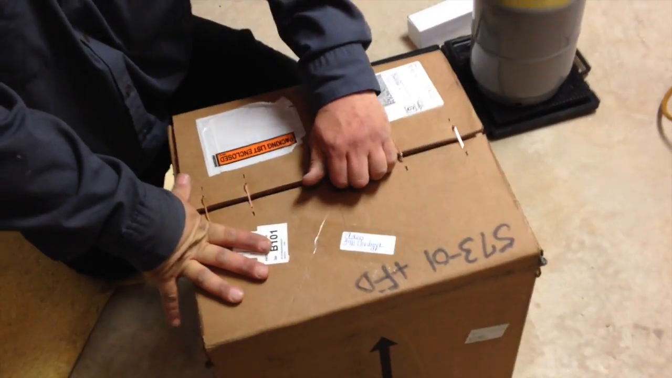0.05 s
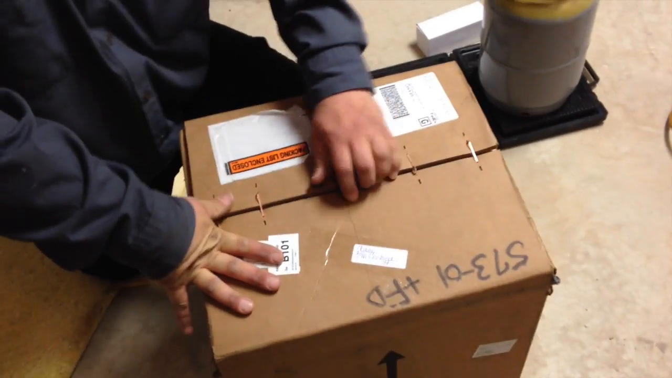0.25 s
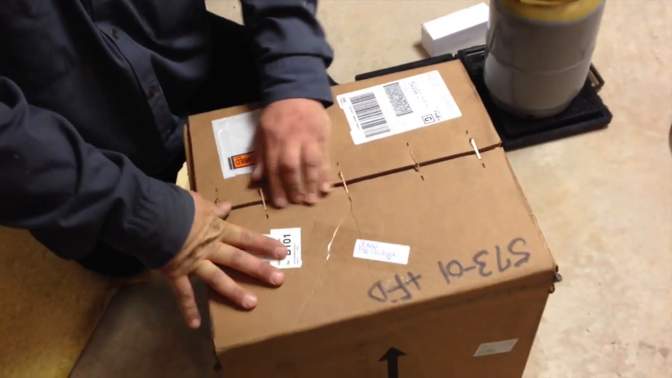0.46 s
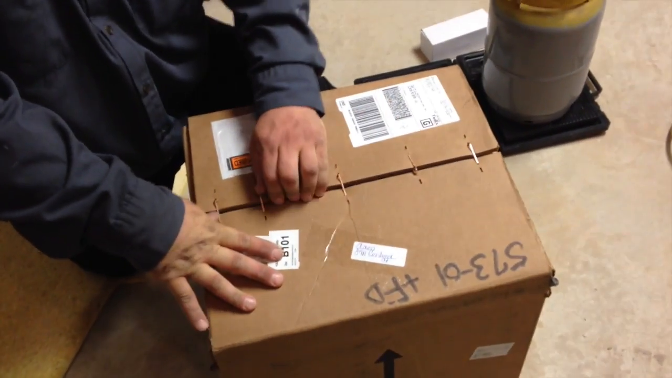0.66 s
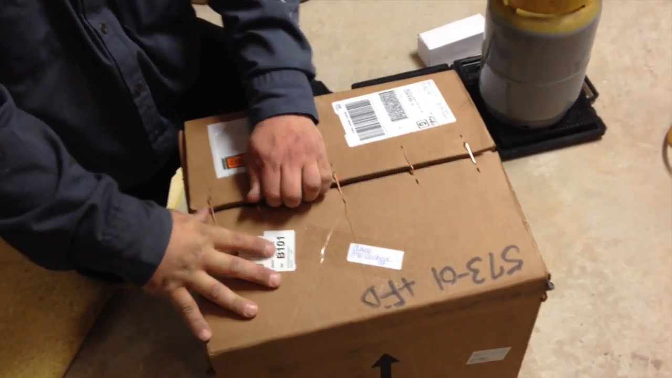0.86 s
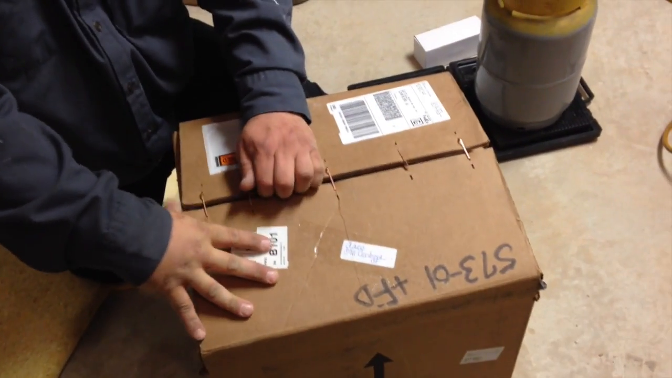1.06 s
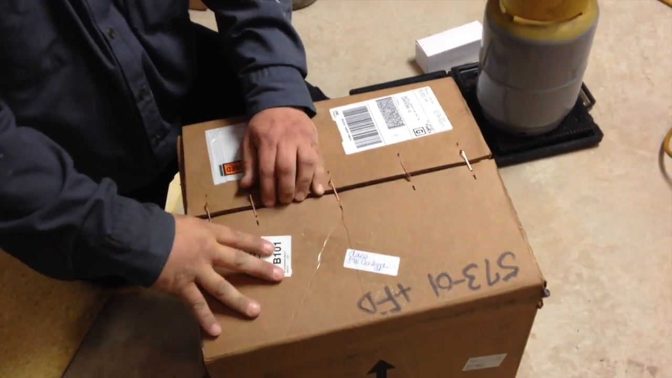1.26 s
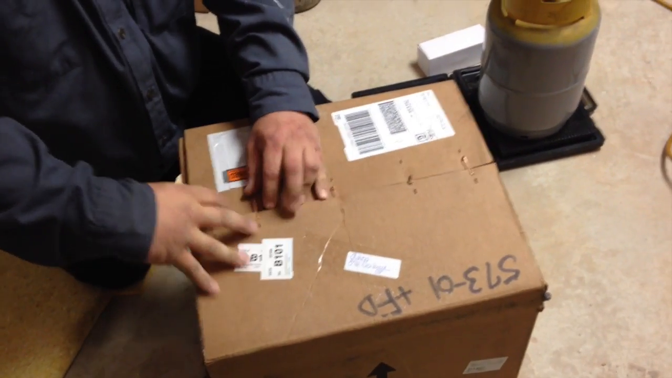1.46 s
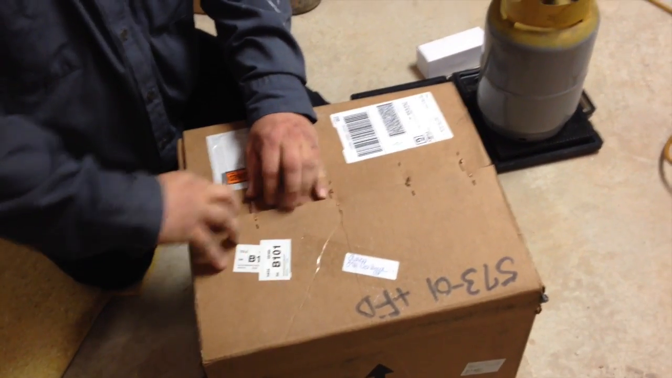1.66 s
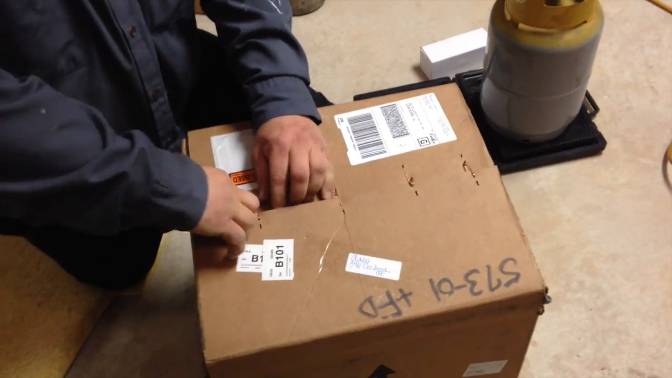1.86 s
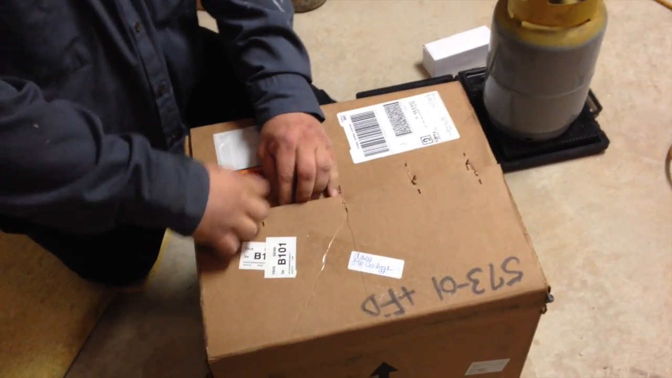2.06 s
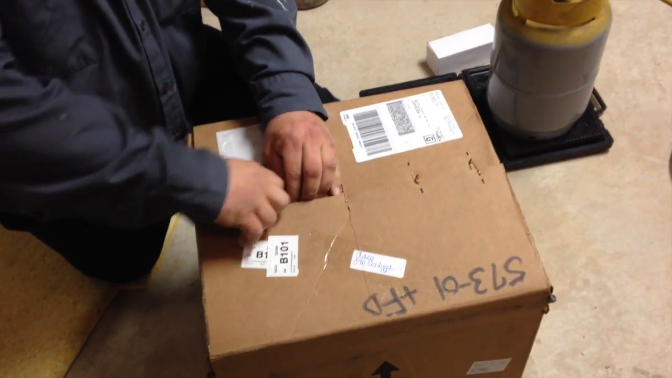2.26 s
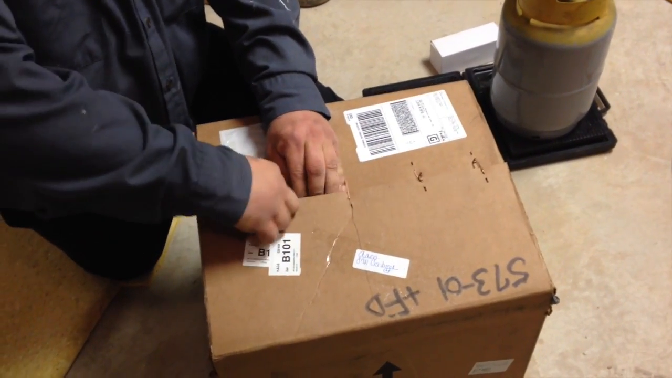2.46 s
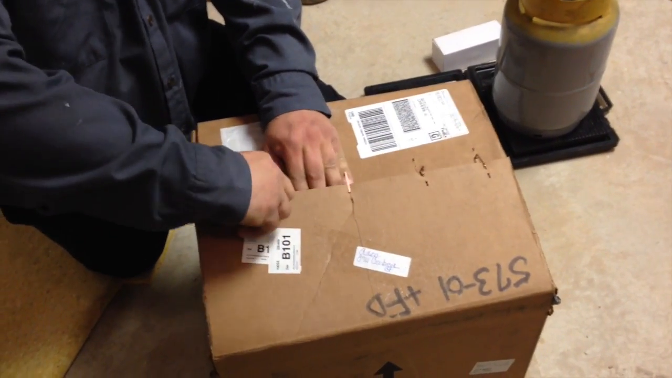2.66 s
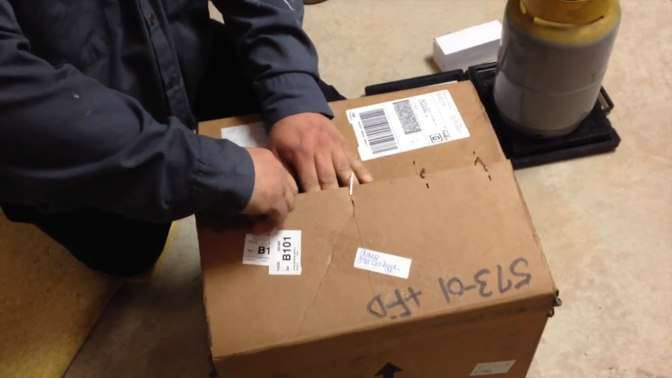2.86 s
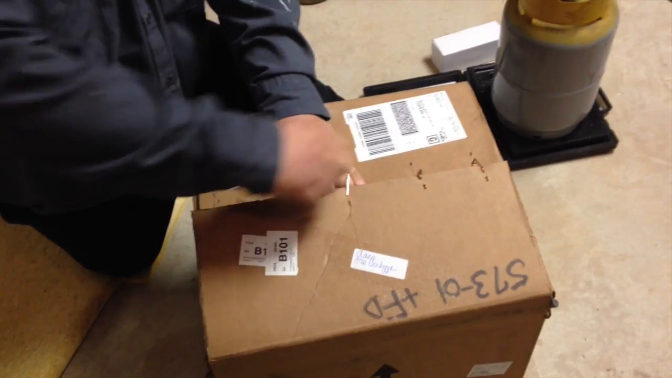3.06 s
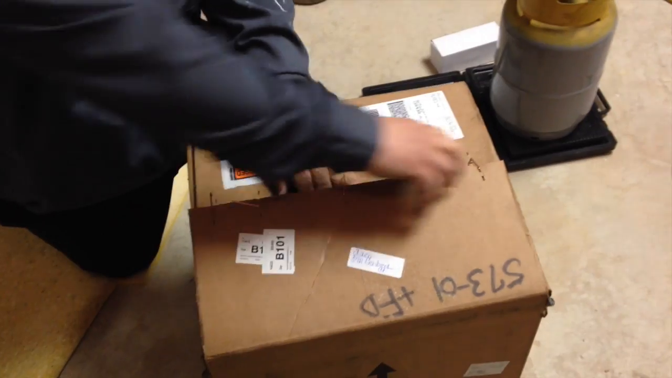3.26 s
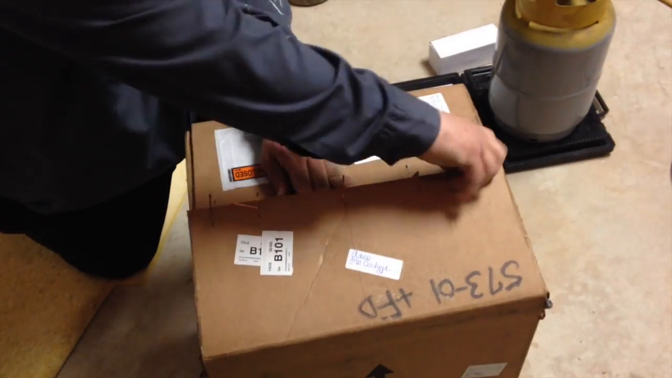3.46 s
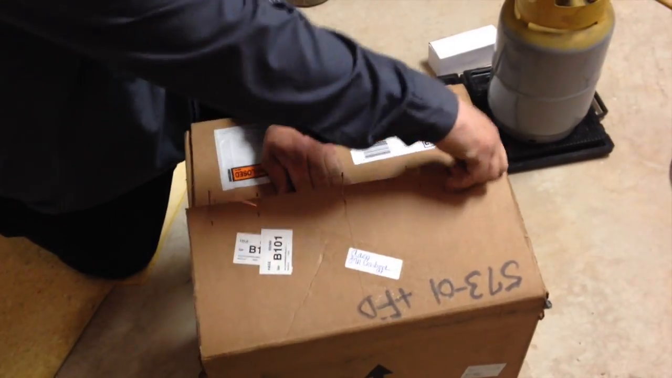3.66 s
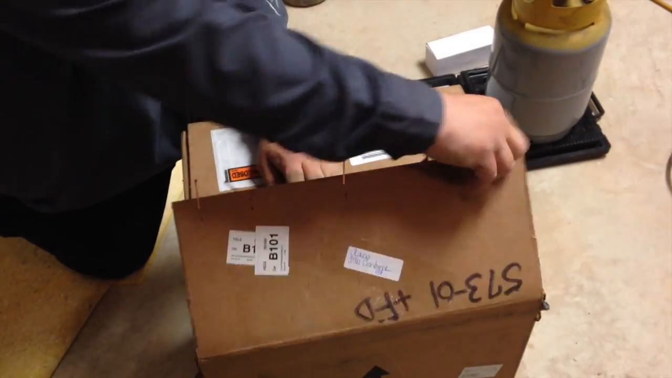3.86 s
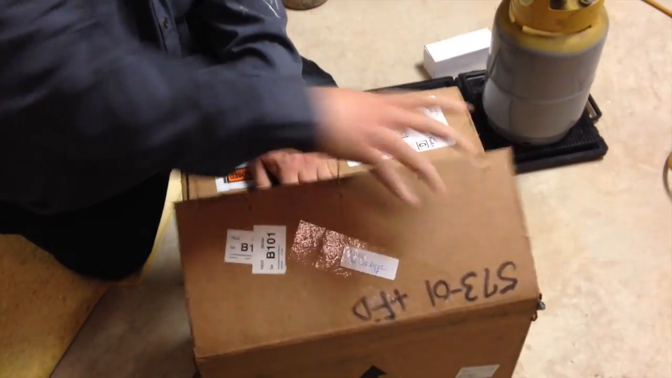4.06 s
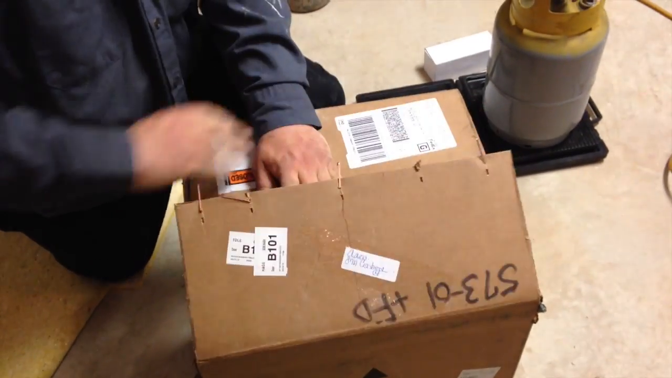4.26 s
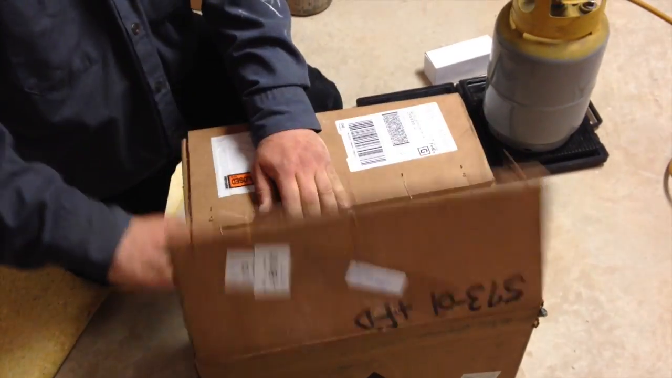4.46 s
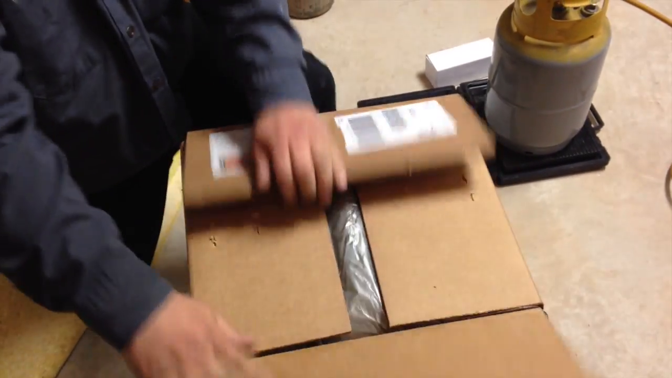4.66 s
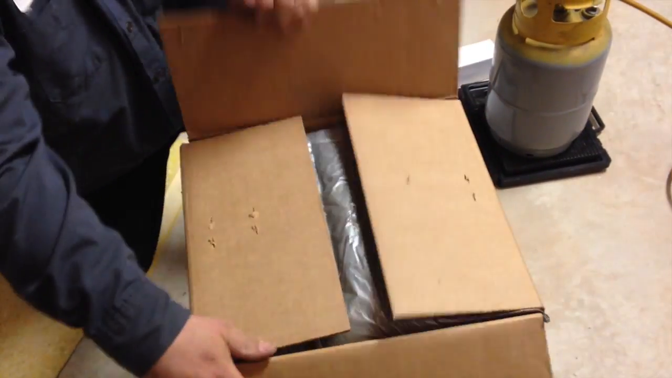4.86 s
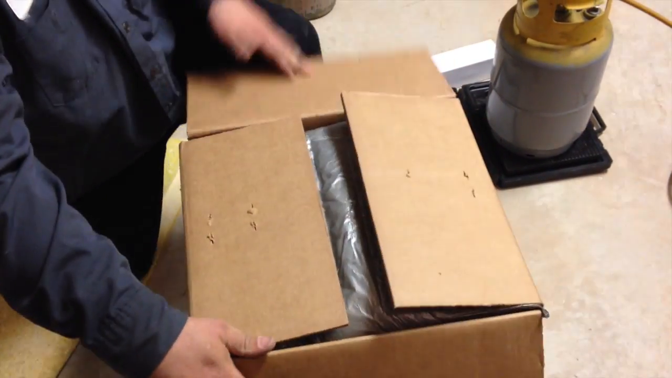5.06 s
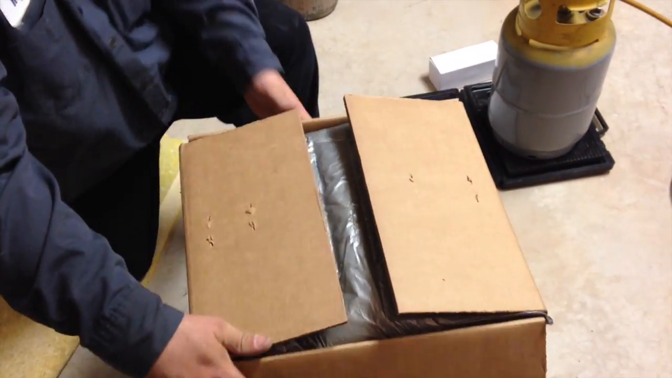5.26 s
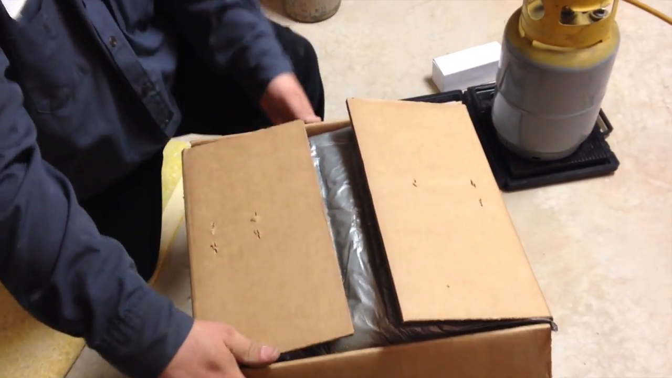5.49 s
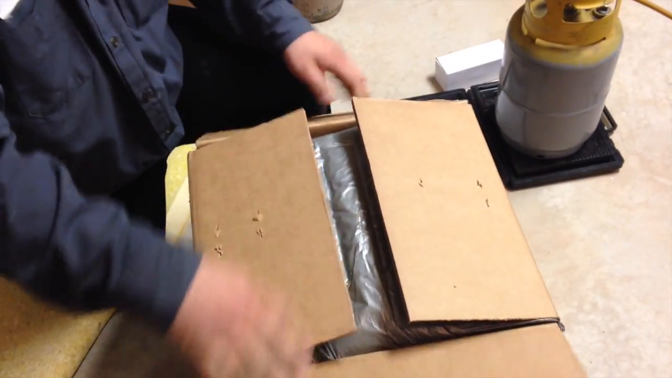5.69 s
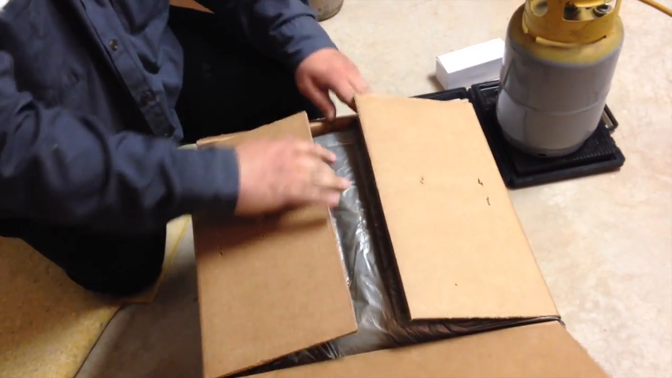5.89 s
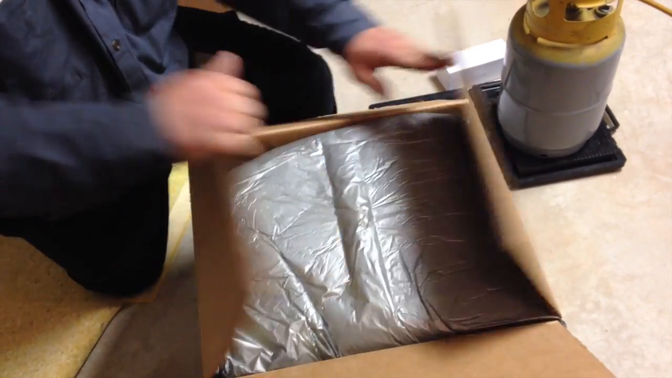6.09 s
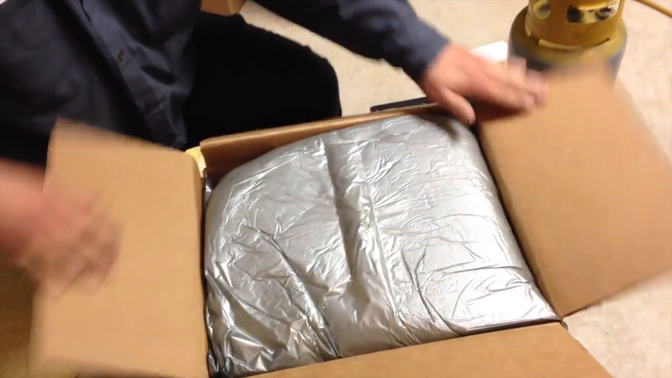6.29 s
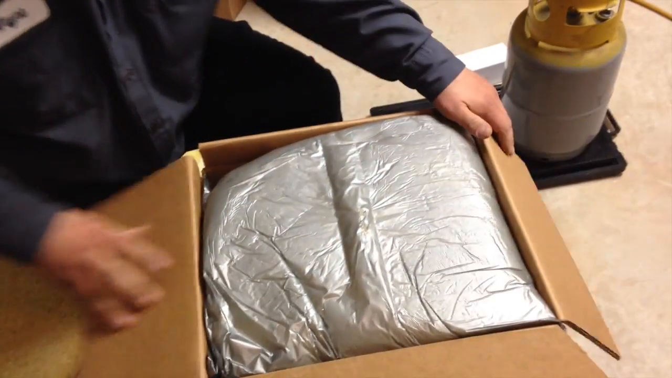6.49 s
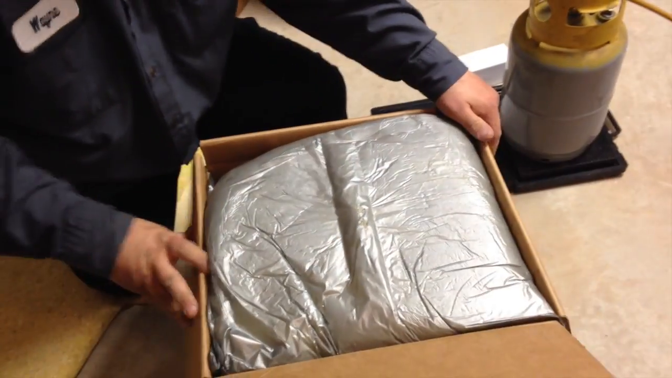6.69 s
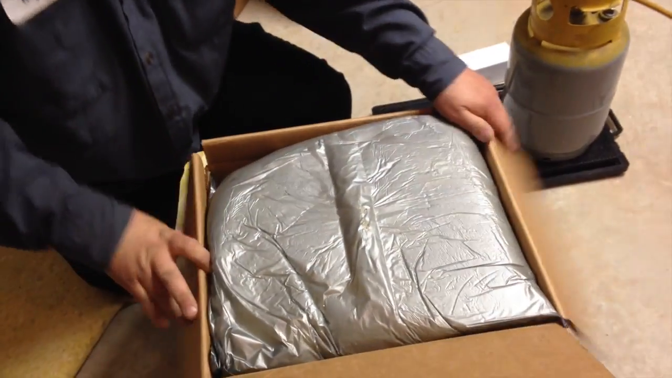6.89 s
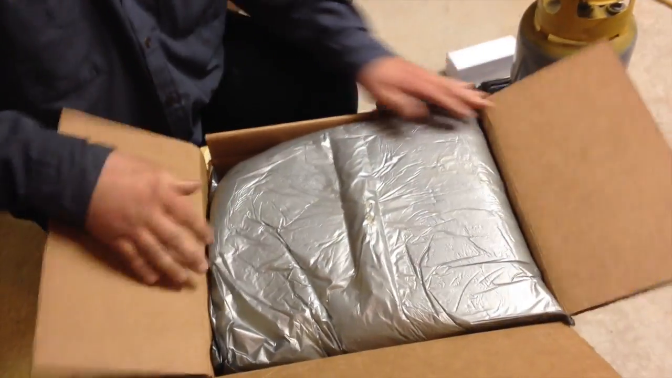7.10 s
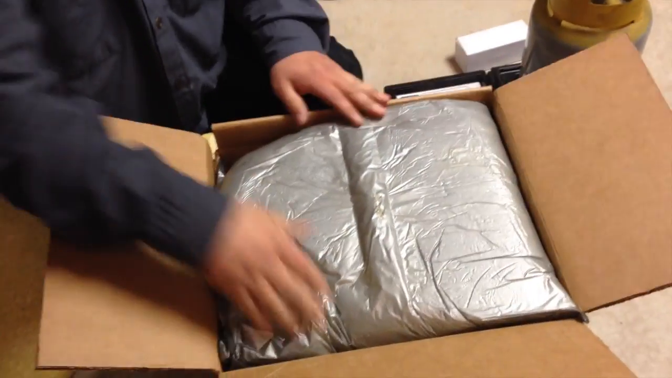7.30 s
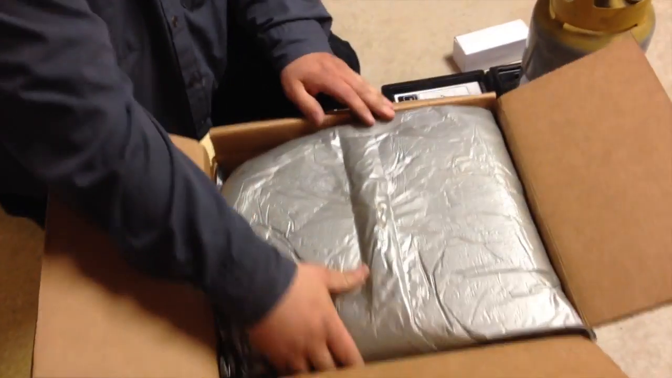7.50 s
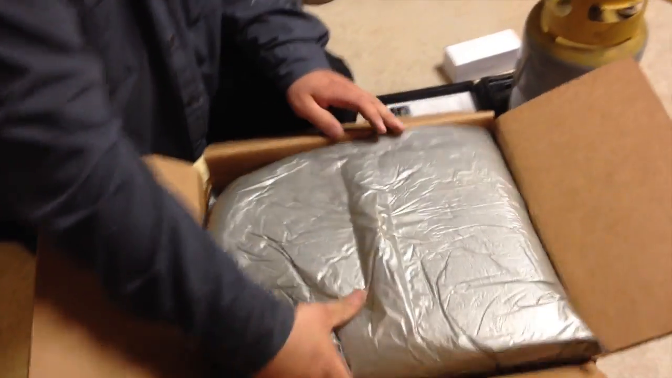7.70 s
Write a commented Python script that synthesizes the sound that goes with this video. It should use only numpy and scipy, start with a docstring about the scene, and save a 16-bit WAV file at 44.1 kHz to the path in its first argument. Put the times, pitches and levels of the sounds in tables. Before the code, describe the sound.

Hands brush and scrape over a hollow cardboard box, a stapled flap snaps loose with a loud pop, then foil wrap crinkles in a quiet room.

```python
"""A large corrugated box is opened by hand indoors, over steady room noise with a faint hum.
First hands and sleeves hiss over the board and its edges rasp; fingers pick at the stapled flaps.
Short pitched sounds, knocks on the hollow box and ripping fibres follow; a flap snaps free at 3.7 s.
The flaps fold back and graze a foil wrap from 5.75 s; at 7.4 s a hand presses into it and it crinkles.
Friction is made of random grains, the box and flaps of decaying modes, and a short room tail joins them."""
import sys
import numpy as np
from scipy import signal
from scipy.fft import rfft, irfft
from scipy.io import wavfile

SR = 44100
rng = np.random.default_rng(int(sys.argv[2]) if len(sys.argv) > 2 else 0)


def store_wav(level_fs):
    """Save 16-bit WAV to argv[1]."""
    pcm = np.round(np.clip(np.atleast_2d(level_fs), -1, 1) * 32767)
    wavfile.write(sys.argv[1], SR, pcm.T.astype(np.int16))


N = 341272
TIME = np.arange(N) / SR
BLOW_GAIN = np.sqrt(.025 * SR)   # turns energy 1 into rms 1 over a 25 ms blow
RISE_SHARE = 0.45   # a drag or press builds over this share of its length
TAP_OCTAVES = 0.62   # width of the range of box modes that a light tap wakes

# panels and air of the box, before the place of contact weights them: (pitch [Hz], level [dB], t60 [s])
BOX = [(112, 2, 0.1), (143.3, 4, 0.073), (205, 1, 0.074), (239, 1.5, 0.049), (302, 1, 0.052),
       (360, 4.5, 0.077), (422, 5, 0.036), (472, 0, 0.029), (550, 2.5, 0.075), (600, -1, 0.076),
       (684, -3.5, 0.042), (807, -1.5, 0.081)]
# strokes of a hand or sleeve over the board:
# (time of fastest moment [s], length [s], level [dB], share of length spent speeding up,
#  sheen relative to level [dB], sheen pitch [Hz]), before the layer trims
STROKES = [(0.01, 0.17, -63.5, 0.46, -22, 4940), (0.28, 0.083, -61, 0.11, 2, 9500),
           (0.408, 0.039, -61.5, .25, 6.5, 6500), (0.43, 0.13, -50, 0.2, -0.5, 10300),
           (0.535, 0.098, -57.5, 0.67, -3.5, 6500), (.68, 0.27, -64, 0.32, -3.5, 7500),
           (1.05, 0.15, -63.5, 0.64, 0, 7850), (1.242, 0.39, -61.5, 0.28, -16, 5000),
           (1.463, 0.19, -56, 0.47, 0.5, 8400), (1.775, 0.19, -56, 0.44, -1.5, 5430),
           (2.021, 0.049, -61.5, 0.45, 2, 5970), (2.513, 0.15, -65, 0.75, 0.5, 7740),
           (2.649, 0.055, -51.5, 0.52, 0.5, 7300), (3.353, 0.099, -68, 0.13, 4, 7400),
           (3.571, 0.053, -58, 0.51, -9, 6000), (3.945, 0.35, -59.5, 0.33, -3, 7200),
           (4.437, 0.064, -45, 0.25, -10, 5100), (4.611, 0.1, -53, 0.59, -11, 6000),
           (4.726, 0.29, -60, 0.73, 3, 8200), (4.884, 0.12, -50, 0.76, -3, 10300),
           (5.078, 0.076, -52, 0.34, 6, 9000), (5.436, 0.2, -58, 0.7, -3.5, 7500),
           (5.725, 0.37, -55, 0.86, 1.5, 7600), (5.861, 0.074, -62.5, 0.67, 7, 8250),
           (6.145, 0.35, -57, 0.93, -4, 7550), (6.322, 0.09, -48, 0.61, 5.5, 9750),
           (6.392, 0.17, -55, 0.42, 0, 10000), (6.504, 0.22, -48.5, 0.2, 0, 11000),
           (6.738, 0.17, -48.5, 0.52, -5, 10700), (7.062, 0.26, -50.5, 0.59, -3.5, 9750)]
# presses on the foil wrap, before the layer trims: (time of hardest moment [s], length [s], level [dB])
PRESSES = [(7.397, 0.053, -39), (7.434, 0.14, -38), (7.538, 0.23, -42), (7.654, 0.23, -38.5),
           (7.729, 0.065, -38)]
# faint shifting of hands that never quite rest, before the layer trims: (time [s], level [dB])
FIDGET = [(0, -71.5), (1.9, -66), (3.25, -74), (4.35, -70), (5.2, -63.5), (7.74, -66)]


def from_db(db):
    """Decibels to gain."""
    return 10 ** (np.asarray(db) / 20)


def rms_one(x):
    """Scale to an rms of 1."""
    return x / np.sqrt(np.mean(x ** 2) + 1e-20)


def energy_one(x):
    """Scale to an energy of 1."""
    return x / np.sqrt(np.sum(x ** 2) + 1e-20)


def in_time(rows):
    """Each column of a curve, sample by sample."""
    s, *columns = np.transpose(rows)
    return [np.interp(TIME, s, c) for c in columns]


def at_hz(points, hz):
    """Read a table on a log-frequency axis."""
    f, value = np.transpose(points)
    return np.interp(np.log(np.maximum(hz, 1)), np.log(f), value)


def dying(t, t60):
    """Exponential decay, 60 dB down after t60 seconds."""
    return np.exp(-np.log(1000) * t / t60)


def through(x, response):
    """Pass a sound through an impulse response."""
    return signal.oaconvolve(x, response)[:len(x)]


def response_of(spectrum, size=4096):
    """Causal (minimum-phase) impulse response of a spectrum, energy 1."""
    level_db = at_hz(spectrum, np.fft.rfftfreq(size, 1 / SR))
    cepstrum = irfft(np.log(from_db(level_db)))
    # folding the cepstrum onto positive time makes the phase minimal
    cepstrum[1:size // 2] *= 2
    cepstrum[size // 2 + 1:] = 0
    return energy_one(irfft(np.exp(rfft(cepstrum))))


def resonance(t, hz, q):
    """Response of one damped resonance, energy 1."""
    return energy_one(np.cos(2 * np.pi * hz * t) * t * np.exp(-np.pi * hz / q * t))


def drift(per_s):
    """Random wander with per_s knots a second and an rms of 1."""
    knots = rng.standard_normal(4000)
    return rms_one(np.interp(TIME * per_s, np.arange(len(knots)), knots))


def grains(per_s, spread_db, size=N):
    """Random tiny slips of uneven size, rms 1."""
    heights_db = spread_db * np.minimum(rng.exponential(1, size), 5)
    sizes = from_db(heights_db) * rng.choice([-1, 1], size)
    return rms_one(sizes * (rng.random(size) < per_s / SR))


def add(out, s, sound):
    """Mix a sound in at time s."""
    at = round(s * SR)
    out[at:at + len(sound)] += sound[:N - at]


def together(*gains):
    """Unrelated causes add in power."""
    return np.sqrt(sum(gain ** 2 for gain in gains))


def swell(phase, rise, ends_db=15, roundness=1.49):
    """Gain of one movement: it builds to its top at phase 0, then eases off to ends_db below."""
    rise = np.clip(rise, .05, .95)
    distance = np.maximum(-phase / rise, phase / (1 - rise))
    return from_db(-ends_db * distance ** roundness)


def movements(times, lengths, levels_db, rise=RISE_SHARE):
    """Gain of overlapping hand movements, added in power."""
    t = TIME[::64, None]   # a coarse grid is enough for a smooth gain
    gains = from_db(levels_db) * swell((t - times) / lengths, rise)
    return np.interp(TIME, t[:, 0], np.sqrt(np.sum(gains ** 2, axis=1)))


def background(air_db=-63.5, hum_hz=61, hum_db=-73.5):
    """Steady room noise is shaped noise; the faint mains hum is one sine."""
    # spectrum of the room noise: (frequency [Hz], density [dB per Hz])
    room_tone = [(25, -29), (55, -20), (90, 9.5), (170, 7), (370, 6), (600, -1), (1000, -6.5), (1900, -6.5),
                 (2900, -19.5), (5000, -15.5), (8000, -16.5), (15000, -18.5)]
    air = from_db(air_db) * through(rng.standard_normal(N), response_of(room_tone))
    hum = from_db(hum_db) * np.sqrt(2) * np.sin(2 * np.pi * hum_hz * TIME)
    return air + hum


def sliding(flutter_db=1.55, hiss_db=1.0, sheen_db=-1.0, fidget_sheen_db=-8, catch_db=-11.5,
            patchy_db=3.5, sheen_octaves=0.54):
    """Skin and cloth on paper: very fine friction and a few catches; each stroke's sheen has its pitch."""
    # spectrum of the friction: (frequency [Hz], density [dB per Hz])
    hiss_spectrum = [(1100, -3.5), (2300, 2), (2900, -3), (4000, 3.5), (5200, 4), (6300, 1), (7500, -5.5),
                     (9500, -7), (15000, -17)]
    s, length, level, rise, brightness, pitch_hz = np.transpose(STROKES)
    fidget = from_db(in_time(FIDGET)[0])
    fine = from_db(hiss_db) * grains(per_s=8000, spread_db=0.5)
    catches = from_db(catch_db) * grains(per_s=130, spread_db=0.5)
    hiss = together(movements(s, length, level, rise), fidget) * through(fine + catches, response_of(hiss_spectrum))

    # share each stroke's sheen among bands by their distance from its pitch
    bands = np.geomspace(4800, 13500, 7)
    shares = 1 / (1 + (np.log2(bands[:, None] / pitch_hz) / sheen_octaves) ** 2) ** 2
    shares_db = 10 * np.log10(shares / shares.sum(axis=0))
    fidget_sheen = from_db(fidget_sheen_db) * fidget / np.sqrt(len(bands))
    sheen = 0
    for hz, share_db in zip(bands, shares_db):
        skim = together(movements(s, length, level + brightness + share_db, rise), fidget_sheen)
        patches = from_db(patchy_db * drift(45))   # the contact is never even
        ring = resonance(TIME[:SR // 100], hz, q=3.6)
        sheen = sheen + skim * patches * through(grains(per_s=4200, spread_db=3.5), ring)
    return from_db(flutter_db * drift(110)) * (hiss + from_db(sheen_db) * sheen)


def box_ring(t, pitch_hz, chance=0, stretch=1, octaves=TAP_OCTAVES, uneven_db=4.5, radiate_hz=108):
    """The modes of the hollow box; the place of contact favours those near one pitch."""
    hz, db, t60 = np.transpose(BOX)
    gain = from_db(db + uneven_db * chance) / (1 + (np.log2(hz / pitch_hz) / octaves) ** 2)
    gain = gain * (-1) ** (np.arange(len(hz)) // 2)   # panels swing in and out against each other
    modes = np.sin(2 * np.pi * stretch * hz[:, None] * t) * dying(t, t60[:, None])
    # a small box radiates little bass
    high_pass = signal.butter(2, radiate_hz, "high", fs=SR, output="sos")
    return energy_one(signal.sosfilt(high_pass, gain @ modes))


def scraping(judder_db=4.2, drum_hz=265, rasp_db=-2.5, drum_db=-2.5, fidget_rasp_db=-2.0, fidget_drum_db=-1.0,
             stroke_rasp_db=-11.5, stroke_drum_db=-20, press_rasp_db=-15, press_drum_db=-18):
    """Edges and hands catch on the corrugation: coarse slips rasp in the board and drum on the box."""
    # board edges dragging on board, before the layer trims: (time of hardest moment [s], length [s],
    #  rasp level [dB], box drumming level [dB], drumming pitch [Hz])
    drags = [(0.322, 0.3, -68, -57.5, 272), (0.658, 0.089, -55.5, -56.5, 231),
             (0.788, 0.074, -43.5, -44.5, 297), (0.836, 0.075, -47.5, -44.5, 236),
             (1.29, 0.43, -59, -58, 318), (1.765, 0.054, -45, -46.5, 265), (2.008, 0.029, -49, -50.5, 383),
             (2.633, 0.068, -61, -54.5, 398), (3.394, 0.037, -61, -51, 190),
             (3.549, 0.1, -52.5, -50.5, 247), (3.954, 0.11, -65, -53.5, 350),
             (4.34, 0.038, -55, -47.5, 288), (4.413, 0.06, -57, -50, 400), (4.462, 0.035, -65, -44, 139),
             (4.59, 0.28, -61, -58.5, 355), (4.755, 0.053, -57, -50, 560), (4.822, 0.053, -53.5, -50, 370),
             (5.093, 0.043, -58, -47, 210), (6.793, 0.18, -54.5, -61.5, 372)]
    # spectrum of the rasp: (frequency [Hz], density [dB per Hz])
    rasp_spectrum = [(300, -5.5), (600, -1.5), (850, 0), (1150, 2), (1750, 4.5), (2150, 2), (2450, -1.5),
                     (2900, -15), (4500, -9.5), (9000, -27)]
    t, board = TIME[:SR // 4], response_of(rasp_spectrum)

    # hands: strokes, presses and fidgeting share one run of slips
    slips = grains(per_s=1600, spread_db=2.4) * from_db(judder_db * drift(90))
    hand = movements(*np.transpose(STROKES)[:4])
    press = movements(*np.transpose(PRESSES))
    fidget, = in_time(FIDGET)
    rasp_gain = together(from_db(stroke_rasp_db) * hand, from_db(press_rasp_db) * press,
                         from_db(fidget + fidget_rasp_db))
    drum_gain = together(from_db(stroke_drum_db) * hand, from_db(press_drum_db) * press,
                         from_db(fidget + fidget_drum_db))
    rasp = rasp_gain * through(slips, board)
    drum = drum_gain * through(slips, box_ring(t, drum_hz))

    # edges: each drag drums at a pitch set by where it drags
    edge_slips = grains(per_s=1600, spread_db=2.4) * from_db(judder_db * drift(90))
    for s, length, rasping, drumming, pitch_hz in drags:
        near = np.abs(TIME - s) < 2 * length
        push = edge_slips[near] * swell((TIME[near] - s) / length, RISE_SHARE)
        rasp[near] += from_db(rasping) * through(push, board)
        drum[near] += from_db(drumming) * through(push, box_ring(t, pitch_hz))
    return from_db(rasp_db) * rasp + from_db(drum_db) * drum


def chirps(onset=0.12, q=3.8):
    """A dying burst of noise, as of stick-slip or a snap, drives one resonance; longer ones start softer."""
    # pitched slips of fingers, staples and board edges, and short rings of the flap
    # as it snaps free and rebounds: (time [s], level [dB], pitch [Hz], t60 of the burst [s])
    pitched_sounds = [(.428, -47, 1750, 0.26), (1.4315, -41.5, 1860, 0.0081), (1.761, -47.5, 1640, 0.054),
                      (2.3718, -44.5, 5760, 0.017), (2.395, -48.5, 5560, .04), (3.064, -55.5, 1270, 0.022),
                      (3.0636, -49.5, 4160, 0.017), (3.155, -54, 2000, 0.0092), (3.156, -51, 1140, 0.027),
                      (3.686, -41.5, 830, 0.021), (3.72, -45.5, 378, 0.046), (3.769, -52, 384, 0.02),
                      (3.929, -51.5, 5850, 0.053), (4.411, -52, 1070, 0.053), (5.9376, -52, 2060, 0.0057)]
    out, t = np.zeros(N), TIME[:SR // 4]
    for s, db, hz, t60 in pitched_sounds:
        burst = rng.standard_normal(len(t)) * dying(t, t60) * (1 - np.exp(-t / (onset * t60)))
        chirp = energy_one(through(burst, resonance(t, hz, q)))
        add(out, s, from_db(db) * chirp * BLOW_GAIN)
    return out


def flap_ring(t, detune=0.063):
    """The flap's bending modes, shifted at random by where it is held and touched."""
    # bending modes before the shift: (pitch [Hz], level [dB], t60 [s])
    flap_modes = [(862, -5, 0.032), (1080, -4, 0.03), (1187, 1.5, 0.011), (1410, 2, 0.011),
                  (1697, -4, 0.019), (1850, -3, 0.026), (2085, 2.5, 0.008), (2120, -16.5, 0.012)]
    hz, db, t60 = np.transpose(flap_modes)
    gain = from_db(db) * (-1) ** np.arange(len(hz))
    hz = hz * (1 + detune * rng.standard_normal(len(hz)))
    return gain @ (np.sin(2 * np.pi * hz[:, None] * t) * dying(t, t60[:, None]))


def knocks(clack_t60=0.035, crack_t60=0.062, first_slip=0.63, crack_db=-7.5, grip=0.032, taut=0.013,
           relax_s=0.016, rattle_db=-12.5, rattle_t60=0.078, octaves_per_db=0.1):
    """Blows thump the box; giving fibres make the flap clack and crack, and the loose flap rattles on."""
    # blows, levels as rms over 25 ms, crack before its trim: (time [s], thump level [dB],
    #  thump pitch [Hz], board clack level [dB], fibre crack level [dB])
    blows = [(0.792, -48.5, 302, -50, -56), (0.862, -49.5, 215, -68, -63), (1.315, -53, 367, -56, -73),
             (1.385, -53.5, 350, -53.5, -52), (1.436, -41, 185, -52.5, -34), (1.82, -45, 330, -47, -40.5),
             (2.124, -46, 310, -56.5, -56), (2.25, -46, 182, -50.5, -63), (2.376, -42, 200, -53, -43),
             (2.451, -47, 200, -72, -76), (2.885, -53.5, 168, -88, -78), (2.942, -55, 281, -74, -67),
             (3.091, -52.5, 500, -62, -60), (3.411, -67, 260, -55, -57), (3.504, -54, 256, -55.5, -73),
             (3.515, -45.5, 198, -58, -74), (3.686, -21, 202, -49, -43), (3.985, -42.5, 420, -44.5, -76),
             (4.139, -35, 317, -51, -53), (4.313, -36.5, 274, -49, -48.5), (4.546, -54, 274, -67, -75),
             (4.633, -42.5, 313, -56.5, -74), (4.639, -50, 142, -66, -80), (5.024, -53, 430, -60, -51),
             (5.392, -54, 390, -57.5, -56), (5.634, -44.5, 280, -77, -83), (6.339, -39, 194, -76, -78),
             (6.942, -50, 240, -52.5, -49), (7.399, -45, 300, -58, -41)]
    # spectrum of the cracking fibres: (frequency [Hz], density [dB per Hz])
    crack_spectrum = [(1200, -38), (2800, -5), (3700, 12), (5400, 21.5), (7500, 13), (10200, 10),
                      (12000, 0), (15500, -10)]
    out, t = np.zeros(N), TIME[:SR // 4]
    fibres = response_of(crack_spectrum)
    sagging = t + taut * relax_s * (1 - np.exp(-t / relax_s))   # the pitch falls as the bent panel relaxes
    for s, thump, pitch_hz, clack, crack in blows:
        slips = rng.standard_normal(len(t)) * rng.exponential(1, len(t))
        slips[0] = 2 * first_slip   # the run starts with a set push
        stretch = 1 + grip * rng.standard_normal()   # hand pressure retunes the panels
        # a harder blow wakes a wider range of modes
        width = TAP_OCTAVES + octaves_per_db * max(thump + 43, 0)
        chance = rng.standard_normal(len(BOX))
        box = from_db(thump) * box_ring(sagging, pitch_hz, chance, stretch, width)
        flap = from_db(clack) * energy_one(through(slips * dying(t, clack_t60), flap_ring(t)))
        tick = from_db(crack + crack_db) * energy_one(through(slips * dying(t, crack_t60), fibres))
        # the rattle repeats box and flap at scattered touches
        touches = energy_one(grains(per_s=250, spread_db=2.5, size=len(t)) * t * dying(t, rattle_t60))
        rattle = from_db(rattle_db) * through(box / 2 + flap, touches)
        add(out, s, BLOW_GAIN * (box + flap + tick + rattle))
    return out


def ticks(t60=0.018):
    """A fibre or crease gives way with a bright crack and no thump: a short burst of shaped noise."""
    # single fibres and creases giving way: (time [s], level [dB])
    snaps = [(1.384, -54.5), (1.4314, -49.5), (3.0635, -66.5), (5.937, -51), (6.097, -56), (6.682, -51.5),
             (6.705, -51.5), (6.812, -53.5), (7.365, -56), (7.433, -52), (7.513, -54), (7.61, -55)]
    # their spectrum: (frequency [Hz], density [dB per Hz])
    snap_spectrum = [(400, 0), (2000, 0), (5500, 5), (15000, -5.5)]
    out, t = np.zeros(N), TIME[:SR // 4]
    fibres = response_of(snap_spectrum)
    for s, db in snaps:
        crack = through(rng.standard_normal(len(t)) * dying(t, t60), fibres)
        add(out, s, from_db(db) * energy_one(crack) * BLOW_GAIN)
    return out


def tears(fade_db=11.5):
    """A staple pulls through the board: a dense run of breaking fibres that weakens and stops."""
    # fibres ripping round a staple: (time [s], level halfway [dB], length [s])
    rips = [(1.4305, -37, 0.012), (1.756, -54, 0.03), (2.266, -50, 0.024), (3.041, -59, 0.051),
            (3.502, -55, 0.046), (3.684, -26.5, 0.0048), (3.688, -38.5, 0.049), (4.136, -49.5, 0.029)]
    # spectrum of ripping board: (frequency [Hz], density [dB per Hz])
    rip_spectrum = [(45, -31), (250, 9), (850, -1), (1400, 1), (2000, 4), (2900, -6.5), (4000, -3.5),
                    (6000, -9), (9000, -15.5), (11500, -23), (15500, -50)]
    strain = np.zeros(N)
    for s, db, length_s in rips:
        weakening_db = fade_db * np.linspace(.5, -.5, round(length_s * SR))
        add(strain, s, from_db(db + weakening_db))
    return through(strain * grains(per_s=8400, spread_db=1), response_of(rip_spectrum))


def foil(crease_db=-4, clump_db=2.0, rustle_db=-2.0, flutter_db=1.9, brushed_db=-11, cushion_db=-5,
         cushion_hz=2150, sink_s=0.85, freed_s=5.75, touched_s=7.364):
    """Creases buckle facet by facet over a dense rustle; it sounds hollower as the hand sinks in."""
    # spectrum of the wrap: (frequency [Hz], density [dB per Hz])
    wrap_spectrum = [(100, -32), (400, -3), (1200, -5.5), (2100, 1.5), (2900, -9), (4200, 0), (5100, 1.5),
                     (6500, -5.5), (8500, -8.5), (11000, -11.5), (15500, -15)]
    t = TIME[:SR // 50]
    wrap = response_of(wrap_spectrum)
    # each facet crackles in its own clumps and with its own pitch
    creases = 0
    for hz in np.geomspace(1300, 11000, 14):
        clumps = from_db(clump_db * drift(45)) * grains(per_s=130, spread_db=1.6)
        level = from_db(at_hz(wrap_spectrum, hz)) * np.sqrt(hz)   # wider bands hold more power
        creases = creases + level * through(clumps, resonance(t, hz, q=4))
    creases = rms_one(creases)
    rustle = from_db(flutter_db * drift(130)) * through(grains(per_s=6000, spread_db=0.1), wrap)
    sinking = np.clip((TIME - touched_s) / sink_s, 0, 1)
    cushion = sinking * through(grains(per_s=670, spread_db=3.0), resonance(t, cushion_hz, q=2.4))
    crinkle = from_db(crease_db) * creases + from_db(rustle_db) * rustle + from_db(cushion_db) * cushion
    pressed = movements(*np.transpose(PRESSES)) * (TIME > touched_s)
    # the flaps graze the wrap with each stroke
    brushed = from_db(brushed_db) * movements(*np.transpose(STROKES)[:4]) * (TIME > freed_s)
    return pressed * crinkle + brushed * through(grains(per_s=380, spread_db=2.6), wrap)


def room(x, wet_db=-11.0, bass_wet_db=-7.5, build_s=0.0035):
    """A short diffuse tail of noise, dying band by band, joins the direct sound."""
    # reverberation: (frequency [Hz], t60 [s])
    room_decay = [(200, 0.14), (2000, 0.14), (6000, 0.29), (14000, 0.2)]
    t, tail = TIME[:SR // 2], 0
    edges = np.geomspace(110, 18000, 9)
    for low, high in zip(edges, edges[1:]):
        hz = np.sqrt(low * high)
        band_pass = signal.butter(2, [low, high], "band", fs=SR, output="sos")
        band = signal.sosfilt(band_pass, rng.standard_normal(len(t)))
        shape = energy_one(dying(t, at_hz(room_decay, hz)) * (1 - np.exp(-t / build_s)))
        tail = tail + band * shape * from_db(at_hz([(250, bass_wet_db), (1000, wet_db)], hz))
    return x + through(x, tail)


def scene():
    """All the handling sounds in the room, over its background, on one microphone."""
    handling = sliding() + scraping() + chirps() + knocks() + ticks() + tears() + foil()
    return (room(handling) + background())[None]


def record(dry, cutoff_hz=15400):
    """A steep elliptic low-pass cuts the top."""
    low_pass = signal.ellip(12, .1, 80, cutoff_hz, fs=SR, output="sos")
    return signal.sosfilt(low_pass, dry)


dry = scene()
out = record(dry)
store_wav(out)
```